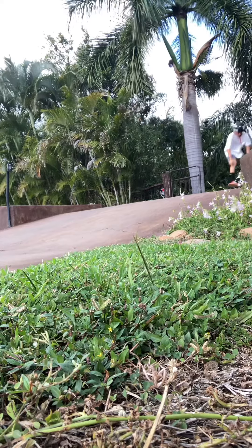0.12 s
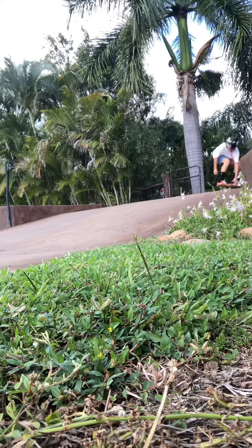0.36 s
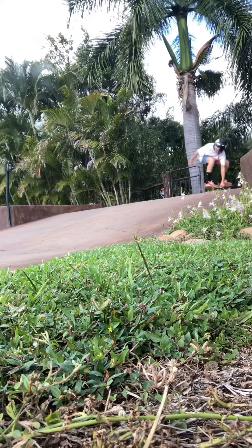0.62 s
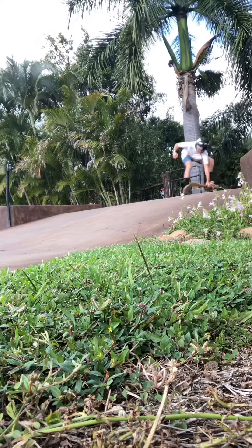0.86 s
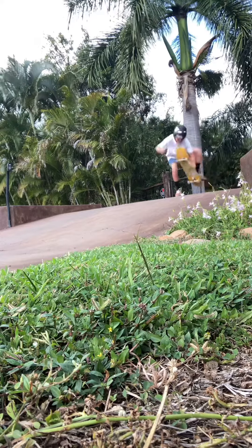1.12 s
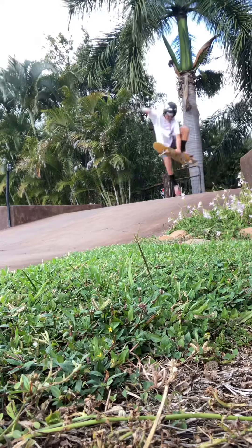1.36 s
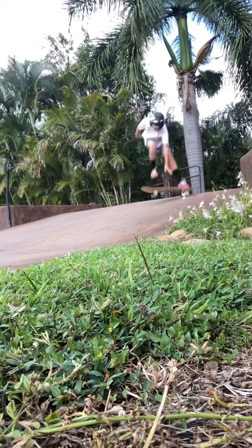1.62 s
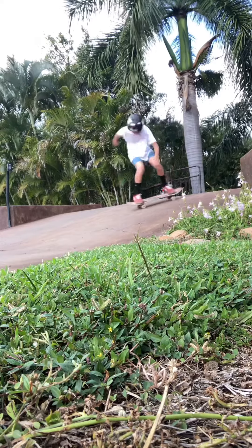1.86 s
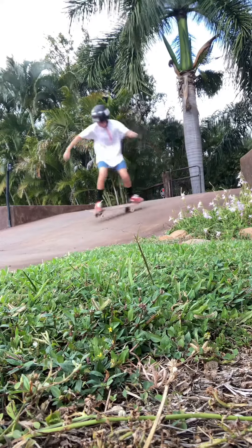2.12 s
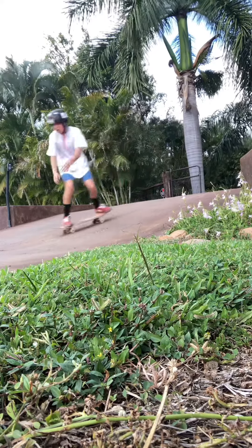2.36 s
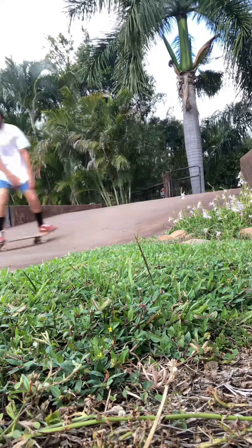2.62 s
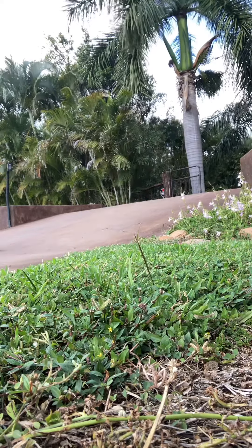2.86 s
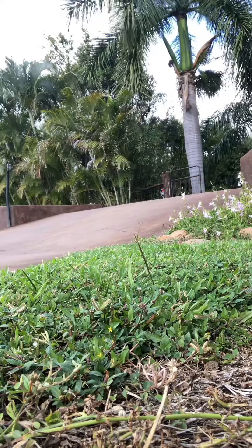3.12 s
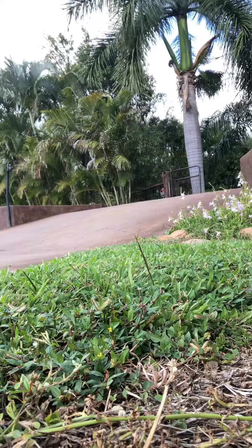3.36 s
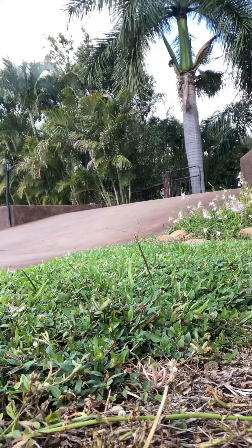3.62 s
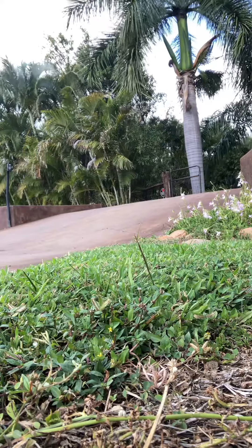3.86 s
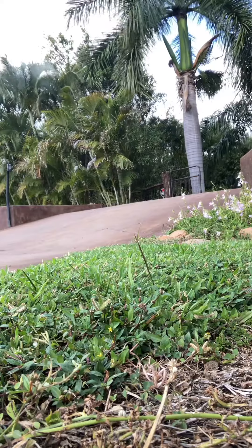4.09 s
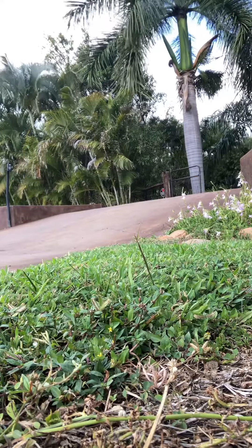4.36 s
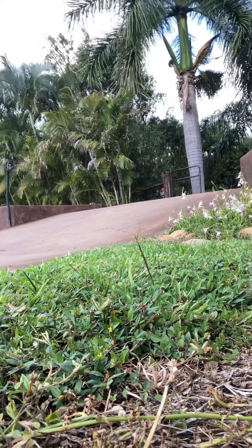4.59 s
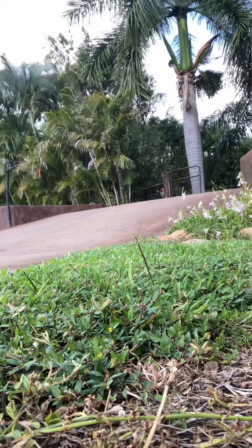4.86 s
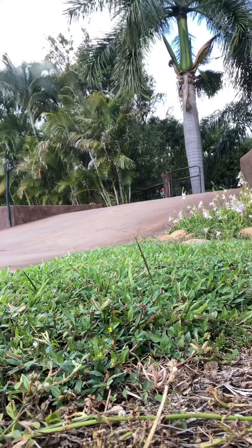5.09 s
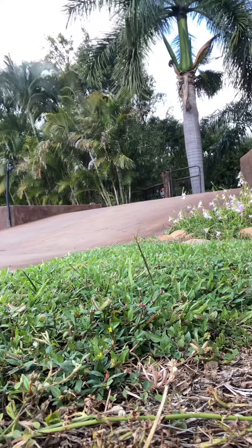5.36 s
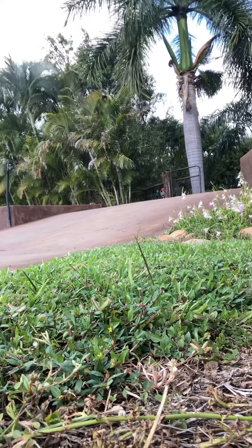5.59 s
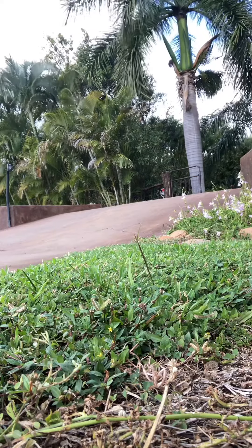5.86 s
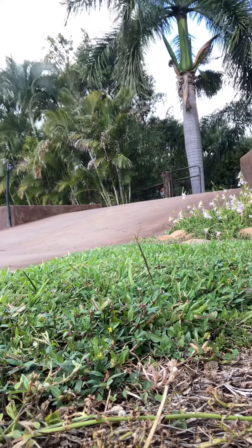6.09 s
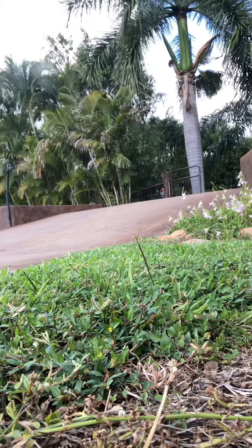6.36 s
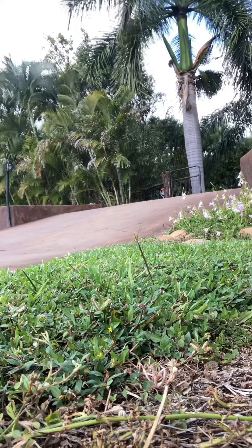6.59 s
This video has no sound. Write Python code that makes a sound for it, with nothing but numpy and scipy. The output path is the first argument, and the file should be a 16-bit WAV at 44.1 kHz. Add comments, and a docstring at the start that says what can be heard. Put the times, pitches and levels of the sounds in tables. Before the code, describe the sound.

Soft garden air with a low hum surrounds a rough concrete drive, heard in stereo by a small microphone near the ground. From 0 s, faint skateboard wheels rumble on the right, with light scraping from 0.6. At about 0.98 the tail pops: one sharp, bright wooden snap. Rolling nearly vanishes while the board is airborne, with tiny scuffs near 1.6. At 1.64-1.73 it lands in a violent, dense burst of deep thuds and cracks, the loudest moment. Another clack comes at 1.98, more at 2.2. Rolling swells, loudest around 2.5-2.8, gritty and hollow, with low bumps and jolts as it passes to the left. From 3.3 it is farther off: booming thuds, rattling scrapes and small clacks, thinning after 4.3. Knocks come at 5.3 and 5.75, a faint rising bird chirp at 5.9-6.0, a last clatter at 6.15, then small taps until about 6.45 and quiet air.

```python
"""A rough concrete drive by a quiet garden, heard by a small two-port microphone close to the ground.
A skateboarder rolls in from the right, pops the board, lands hard and rolls past to the left; far off the
board scrapes, clatters and bounces to rest. A bird chirps once. Rolling is coloured noise and ringing stones
sharing one chain of knocks, blows are rough contacts filtered by board modes, bumps and jolts are decaying
sines, the bird is a gliding sine and the garden air is shaped stereo noise."""
import sys
import numpy as np
from scipy import signal
from scipy.io import wavfile
from scipy.ndimage import uniform_filter1d

SR = 44100
rng = np.random.default_rng(int(sys.argv[2]) if len(sys.argv) > 2 else 0)


def gain_from_decibels(decibels):
    """Convert decibel values to linear amplitude factors."""
    exponent = np.asarray(decibels, float) / 20
    return 10 ** exponent


def wav_out(sig):
    """Save sig, one row per channel (or a flat mono array), as 16-bit PCM at SR to the path in sys.argv[1]."""
    wavfile.write(sys.argv[1], SR, np.round(np.clip(np.atleast_2d(sig).T, -1, 1) * 32767).astype(np.int16))


N = 296352  # samples

# Steady rolling, quiet while the board is in the air. Each row: time in seconds, level of the deck hum in dB.
ROLL_LEVEL = [(0, -49.5), (.4, -44.5), (.65, -45.5), (.9, -54), (1.08, -49.5), (1.5, -56), (1.8, -68),
              (1.88, -42.5), (2.08, -35.5), (2.19, -35.5), (2.26, -29.5), (2.5, -24), (2.7, -25.5),
              (2.9, -29), (3.05, -31.5), (3.13, -30), (3.3, -34), (3.42, -28.5), (3.55, -41), (3.67, -29.5),
              (3.78, -32.5), (4.05, -31), (4.35, -36), (4.58, -40.5), (4.7, -37), (4.85, -41.5),
              (5.15, -39), (5.3, -61), (5.55, -53.5), (5.9, -50), (6.1, -69.5), (6.72, -90)]
# Other rolling layers against the hum, changing with load and distance.
# Each row: time in seconds, rumble in dB, rattle in dB, grit in dB.
LAYER_SHARES = [(0, 8, -8.5, -21), (.3, 4.5, -9.5, -16), (.7, 2.5, -17, -19.5), (1.1, -4, -4.5, -6),
                (1.9, -11, -1, 1), (2.3, -6, -14, -18), (2.9, -7.5, -7, -16.5), (3.25, -3.5, -7.5, -14),
                (3.5, 1, -9.5, -14), (4.1, -10, -8.5, -16), (4.3, -1, -9.5, -18.5), (4.6, 3, -9.5, -18.5),
                (5.1, -9, -4.5, -12), (5.5, 4.5, -0.5, -12.5), (6.72, 0, 9, -32)]
# Scrapes and rough stretches that set the trucks rattling. Each row: start in seconds, length in seconds,
# rattle in dB, hum above rattle in dB, grit above rattle in dB.
SCRAPES = [(0.635, 0.3, -46.5, 4.5, -2), (0.88, 0.17, -46.5, 11.5, -0.5), (1.017, 0.11, -50, -4, -3),
           (1.591, 0.24, -42, -3.5, 0.5), (1.82, 0.11, -48.5, 8.5, 3), (2.598, 0.12, -29, 9.5, -5),
           (2.733, 0.32, -32, -13, -3), (3.28, 0.14, -31, -2, -14), (3.441, 0.37, -30.5, 1.5, -10.5),
           (3.814, 0.18, -40.5, 4, -5.5), (4.06, 0.14, -34, -16, -15), (4.342, 0.23, -38, -18, -10),
           (4.855, 0.15, -33.5, -11, -10.5), (4.978, 0.15, -30, -5, -17), (5.343, 0.047, -43, -2, -11),
           (5.523, 0.35, -42, 0, -14.5), (5.613, 0.15, -37.5, 1.5, -24), (6.141, 0.28, -51, 0, -6),
           (6.431, 0.14, -58, -3, -4)]
SCRAPE_EDGE, SCRAPE_RUMBLE_DB = 0.79, -10.5  # power of the sine arch; rumble against the scrape's hum

# Spectra of the rolling layers. Each row: frequency in Hz, relative density in dB per Hz.
RUMBLE_COLOUR = [(30, -31), (60, -32), (110, -3), (200, -5.5), (300, -13), (600, -52.5), (6000, -89)]
HUM_COLOUR = [(120, -29), (220, -5.5), (350, 1.5), (520, 0.5), (750, -2), (1000, -9), (1500, -53.5),
              (12000, -87)]
RATTLE_COLOUR = [(500, -7.5), (900, 5), (1300, 7), (1700, 0.5), (2100, -11), (2350, -12), (2900, -22.5),
                 (4500, -42), (12000, -76)]
GRIT_COLOUR = [(1500, -13), (2600, -7), (3400, -5.5), (4200, -5.5), (5000, -5), (6200, -1), (8000, 0.5),
               (11000, 5.5), (14000, 7), (15700, 5.5), (15950, -69)]
# Hollow ring of the wheels. Each row: time in seconds, pitch in Hz, level against the plain rattle in dB.
HOLLOW = [(0, 1710, -13), (.98, 2010, -7.5), (2.3, 1630, -4), (3.0, 1610, -25), (3.3, 1920, -5.5),
          (3.43, 1940, -4), (3.5, 1480, 1.5), (3.62, 1390, -5), (3.8, 1450, 1), (3.95, 1720, -2),
          (4.1, 1680, -1.5), (4.17, 1900, 0.5), (4.3, 1770, -0.5), (4.5, 1840, -4), (4.9, 1850, -6.5),
          (5.1, 1740, -5.5), (6.72, 1700, -2.5)]
HOLLOW_WIDTH_HZ = 283  # of each resonator pass
# Treble ring of the axles, moving with the load. Each row: time in seconds, lower pitch in Hz,
# its gain on the treble in dB, upper pitch in Hz, its gain on the treble in dB.
AXLES = [(0, 6360, -6, 10400, 0), (.7, 6300, -8, 9000, -4), (.98, 6440, -3, 8700, -1),
         (1.1, 6300, -12, 9500, -22), (1.62, 5800, -12, 9500, -11), (1.64, 5900, 7.5, 9600, -17),
         (1.66, 6170, -3, 8500, 0), (1.73, 6640, -2, 9450, -9), (1.8, 6300, -8, 9600, -11),
         (2.2, 6000, -6, 10800, -19), (2.6, 5930, -0.5, 11100, -3), (2.95, 5800, -2, 10600, 4.5),
         (3.1, 4800, -0.5, 10600, 1.5), (3.7, 5000, -0.5, 10500, -15), (3.8, 6030, -18, 10400, -3.5),
         (4.15, 4400, -20, 11000, 1), (4.3, 4440, -7, 11000, -9), (4.36, 4370, -3, 6800, -8),
         (4.5, 4350, -6, 6700, -1.5), (4.85, 4600, 1, 6900, -13), (4.92, 4600, -3, 7260, -9),
         (5.05, 4730, 6, 9500, -10), (5.2, 4600, -9, 9500, -15), (5.8, 4700, 0, 9440, -5),
         (6.72, 4500, -11, 9500, -3)]
# Widths of the lower and upper axle resonators, per pass, in Hz.
AXLE_WIDTH_HZ = (1630, 2200)

# Blows on the board, layer levels over 10 ms before mixing. Each row: time in seconds, deck in dB,
# truck clack in dB, crack in dB, nominal contact decay time (t60) in seconds, later held within limits.
BLOWS = [(0.812, -37.5, -40.5, -39, 0.064), (0.934, -28, -50, -43, 0.034),
         (0.981, -18.5, -18.5, -27, 0.034), (0.997, -30, -48, -32.5, 0.17), (1.01, -26.5, -36, -32, 0.15),
         (1.555, -38.5, -44, -42.5, 0.11), (1.586, -41, -43, -42, 0.094), (1.64, -12.5, -34, -16.5, 0.031),
         (1.646, -21, -45, -45, 0.03), (1.654, -29, -45, -24, 0.044), (1.659, -23.5, -49, -44, 0.025),
         (1.677, -11.5, -41, -16.5, 0.033), (1.681, -18, -50, -40, 0.01), (1.694, -20.5, -50, -25.5, 0.031),
         (1.7, -28, -36, -46, 0.033), (1.709, -26, -41, -34, 0.025), (1.724, -32, -53, -26.5, 0.02),
         (1.728, -15, -55, -33, 0.066), (1.734, -20, -36, -28, 0.02), (1.82, -35, -51, -42.5, 0.034),
         (1.907, -50, -60, -31, 0.014), (1.963, -35, -38, -31, 0.071), (1.97, -26.5, -44, -30, 0.088),
         (1.976, -25, -26.5, -18.5, 0.09), (1.985, -14.5, -30, -30, 0.035),
         (2.204, -18.5, -28, -24.5, 0.047), (2.213, -21.5, -23.5, -24.5, 0.11),
         (2.24, -20, -28, -36, 0.038), (2.287, -37, -44, -41.5, 0.014), (2.316, -24, -47, -49, 0.0037),
         (2.48, -31, -40, -34.5, 0.032), (2.491, -30, -35, -33.5, 0.073), (2.554, -20, -24.5, -30, 0.062),
         (2.62, -47, -23, -30, 0.088), (2.648, -27, -49, -32, 0.03), (2.667, -31, -55, -51, 0.055),
         (2.695, -24, -22.5, -32, 0.046), (2.764, -50, -50, -41, .012), (2.785, -21.5, -24.5, -30, 0.18),
         (2.821, -27, -33, -38, 0.032), (2.988, -28, -46, -35.5, 0.13), (3.004, -36, -41, -41, .015),
         (3.037, -27.5, -45, -48, 0.022), (3.336, -50, -28.5, -34, 0.023), (3.345, -35, -31, -45, 0.0093),
         (3.394, -51, -27, -53, 0.035), (3.403, -52, -25.5, -40.5, 0.019), (3.503, -53, -29, -41, 0.026),
         (3.515, -52, -41, -39, 0.017), (3.528, -58, -29.5, -39, 0.022), (3.565, -47, -40, -35.5, 0.016),
         (3.661, -50, -50, -40, 0.01), (3.784, -52, -47, -42, .01), (3.849, -49, -30.5, -40, 0.066),
         (3.932, -55, -52, -44, .008), (3.951, -55, -50, -48, .01), (4.091, -55, -45, -53, 0.0087),
         (4.119, -30, -47, -59, 0.029), (4.159, -31, -35, -38.5, 0.027), (4.227, -43, -29.5, -45, 0.04),
         (4.319, -60, -49, -57, .01), (4.369, -58, -55, -52, .008), (4.397, -55, -47, -46, .012),
         (4.445, -60, -55, -47, .012), (4.565, -60, -44, -49, .01), (4.812, -51, -35.5, -46, 0.035),
         (4.844, -62, -45, -47, .008), (4.875, -59, -35, -47, 0.022), (4.889, -54, -36, -42, 0.027),
         (4.908, -49, -33, -43, 0.045), (4.923, -55, -36, -51, .012), (5.026, -38, -35, -52, .02),
         (5.09, -33, -50, -55, 0.016), (5.333, -33.5, -36, -42, 0.068), (5.345, -30, -33, -44.5, 0.034),
         (5.713, -51, -39.5, -53, 0.019), (5.764, -30.5, -37, -66, 0.027), (5.776, -44, -30, -55, 0.088),
         (6.154, -44, -31, -55, 0.038), (6.157, -35, -24, -46, 0.031), (6.164, -34, -33, -49, 0.047),
         (6.263, -48, -36.5, -55, 0.06), (6.268, -42.5, -33, -61, 0.038), (6.325, -59, -40, -74, 0.068),
         (6.446, -40.5, -50, -57, 0.046), (6.459, -42, -61, -65, 0.12)]
# Board modes before extra damping, lowest deck mode first, then the trucks.
# Each row: frequency in Hz, level in dB, nominal t60 in seconds.
BOARD_MODES = [(287, 0, 0.051), (793, -5, 0.13), (1080, -15, 0.26), (1135, -3, 0.067), (1485, 3, 0.2),
               (1590, -8, 0.14), (2020, -5, 0.25), (2210, -39.5, 0.113)]
LOW_MODE_DB, DECK_T60_S = -19.5, 0.049  # lowest deck part against the higher; nominal t60 of the higher mode
# The feet load the deck. Each row: time in seconds, pitch of the higher deck mode in Hz,
# dullness of the truck knock from 0 to 1.
LOAD = [(.93, 475, 0.2), (.98, 519, 0), (1.01, 492, 0), (1.64, 530, 1), (1.68, 559, .1), (1.73, 576, 0.1),
        (1.98, 522, 0.26), (2.2, 612, 0.8), (2.8, 535, 0.58), (4.2, 560, 0), (5.3, 615, 0.3),
        (5.8, 490, 0.7), (6.16, 510, 0.66), (6.27, 520, 0.9), (6.33, 520, 0.75), (6.45, 650, .8)]
# The rider's weight flexes the whole deck in its lowest mode. Each row: time in seconds, level in dB.
THUDS = [(.934, -29), (0.982, -31.5), (1.646, -15), (1.649, -13), (1.658, -38), (1.677, -18.5),
         (1.735, -17.5), (2.213, -31), (2.238, -29), (2.541, -46), (2.616, -36), (2.782, -36), (3.036, -34),
         (3.335, -19), (3.348, -20.5), (3.407, -28), (3.527, -25), (3.783, -26.5), (3.846, -26),
         (4.122, -30), (5.711, -29.5), (5.788, -38), (6.164, -34)]
THUD_T60_S = 0.043  # nominal contact decay
# The tail or a wheel snaps hard on the concrete. Each row: time in seconds, level in dB, nominal t60 in seconds.
SNAPS = [(.934, -39, 0.018), (0.9807, -16, 0.01), (1.64, -16, 0.0092), (1.676, -59, .01),
         (2.204, -68, .012), (2.481, -46, .01), (6.157, -49, 0.014)]
# Spectra of snap, dull truck knock and crack. Each row: frequency in Hz, relative density in dB per Hz.
SNAP_COLOUR = [(1000, -30.5), (1500, 17), (2000, 3), (2500, 7), (3100, 7), (3700, 3), (4200, -1),
               (4800, -36), (6400, -3), (9000, -31), (15000, -50)]
DULL_KNOCK_COLOUR = [(400, -28), (700, -4.5), (920, 1.5), (1200, -1.5), (1700, -21), (2300, -23),
                     (3000, -42), (12000, -80)]
CRACK_COLOUR = [(1500, -21), (2600, -13), (3400, -17.5), (4400, -10), (5200, -4), (6200, -3), (8000, -2),
                (11000, 2.5), (14000, 4.5), (15700, 2.5), (15900, -16), (16400, -23), (16700, -69)]

# Wheels drop over joints and dips, and the ground booms.
# Each row: time in seconds, level before decay in dB, settled pitch in Hz.
BUMPS = [(2.213, -33, 166), (2.362, -25, 140), (2.483, -17.5, 115), (2.624, -18, 129), (2.791, -15, 190.5),
         (2.998, -21, 152), (3.07, -18, 187), (3.228, -20, 170), (3.266, -17, 202), (3.328, -30, 199),
         (3.343, -17.5, 113), (3.414, -19.5, 217), (3.432, -22, 218), (3.454, -16, 153), (3.54, -17, 109),
         (3.61, -23, 129), (3.787, -28, 118), (3.859, -20, 115), (3.978, -24, 123), (4.106, -27, 200),
         (4.255, -33, 135), (4.309, -21, 189), (4.671, -28, 136), (5.345, -37.5, 187), (5.678, -44, 156),
         (5.761, -21.5, 209)]
BUMP_CYCLES, BUMP_SAG = 2.47, 0.16  # cycles to decay by 1/e; share by which the pitch starts high
# A wheel strikes a stone edge squarely. Each row: time in seconds, level before decay in dB.
JOLTS = [(2.4902, -19), (2.5565, -24), (2.592, -21), (2.629, -18), (2.6375, -18), (2.649, -23),
         (2.667, -20), (2.7, -21), (2.779, -18), (2.797, -21), (2.852, -22), (3.544, -23), (4.121, -25)]
JOLT_HZ, JOLT_CYCLES = 560, 0.8  # pitch; cycles to decay by 1/e

# The bird's whistle. Each row: time in seconds, mean pitch in Hz, mean level in dB.
CHIRP = [(5.897, 4100, -85), (5.912, 4080, -61), (5.935, 4150, -68), (5.95, 4040, -79), (5.978, 4180, -66),
         (5.997, 4230, -75), (6.01, 4390, -63), (6.02, 4400, -85)]
# Spectrum of the garden air. Each row: frequency in Hz, relative density in dB per Hz.
AIR_COLOUR = [(18, -61), (30, -3.5), (53, 7.5), (163, -13.5), (200, -10.5), (240, -14), (1300, -26),
              (2310, -23), (2490, -30.5), (3680, -31.5), (12800, -39.5), (15000, -61), (15700, -60),
              (15900, -95)]
AIR_DB = -47.5
# Likeness of the air at the two ports. Each row: frequency in Hz, left-right correlation.
AIR_LIKENESS = [(60, 0.96), (150, 0.74), (380, 0.8), (950, 0.25), (2380, -0.5), (5980, 0.98), (15000, 0.96)]

# Ground bounce in front of the microphone, and dulling with distance.
# Each row: time in seconds, extra delay in ms, treble loss in dB per kHz.
BOUNCE = [(0, 0.13, 1.5), (.62, .11, 0.1), (.9, 0.11, 2.5), (1.64, 0.11, 1.5), (1.75, 0.11, 1.2),
          (2.2, .15, 0.5), (2.5, 0.19, 1.14), (2.85, 0.21, 1.3), (3.3, 0.22, 1.4), (3.7, 0.21, 0.76),
          (4.2, 0.21, 1.46), (4.8, 0.27, 1.5), (5.15, 0.25, 2), (6.72, 0.24, 3.5)]
# Times at which the board is on the right, in front and far on the left. Each row: time in seconds.
BEARING_S = [1.2, 2.7, 4.7]
# Port level differences for a near and a far-left board, faded out at the top.
# Each row: frequency in Hz, left minus right in dB.
PORT_TILTS = [
    [(60, 1), (140, -6.5), (330, -4.5), (500, -8.5), (770, -7.5), (1170, -0.5), (1790, 5.5), (2740, -4),
     (4190, 0.5), (6410, 0.5)],
    [(60, -6.5), (140, 0.5), (210, -5), (500, -1.5), (770, 4), (1170, 1.5), (1790, 14), (2740, 16.5),
     (4190, -1.5), (6410, 16.5)],
]
# Port phase for the three bearings, faded out at the top.
# Each row: frequency in Hz, lead of the left port in radians.
PORT_LEADS = [
    [(0, 0), (600, -0.8), (1120, -3.3), (2150, -5.6), (2670, -9.5), (3190, -8.3), (3700, -10.9),
     (4650, -10.6), (5510, -12.4)],
    [(0, 0), (500, 0.2), (860, 1.5), (1700, 4.4), (2500, 5.9), (3010, 3.7), (3600, 6.3), (7500, 6.3)],
    [(0, 0), (430, 0.8), (1800, 3.8), (2500, 4), (2930, 3.4), (4130, 5.5), (5170, 5.5), (6000, 7),
     (7500, 6.3)],
]


def evened(x):
    """Normalization: scales a signal to unit mean power."""
    return x / np.sqrt(np.mean(x ** 2) + 1e-20)


def read(points, hz):
    """Interpolation of a spectrum on a logarithmic frequency axis."""
    f, value = np.transpose(points)
    return np.interp(np.log(hz + 1), np.log(f + 1), value)


def colour(points):
    """Minimum phase: a causal, unit-energy impulse response follows from the log spectrum alone."""
    log_gain = np.log(gain_from_decibels(read(points, abs(np.fft.fftfreq(4096, 1 / SR)))))
    taps = np.fft.ifft(np.exp(np.conj(signal.hilbert(log_gain)))).real[:2048]
    return taps / np.linalg.norm(taps)


def ring(modes, damping):
    """Modal superposition: decaying sines sum to an impulse response of unit energy."""
    t = np.arange(SR // 5) / SR
    taps = np.zeros(len(t))
    for hz, db, t60 in modes:
        taps += gain_from_decibels(db - 60 * damping * t / min(t60, .15)) * np.sin(2 * np.pi * hz * t)
    return taps / np.linalg.norm(taps)


def through(x, taps):
    """Linear filtering: convolution cut to the scene's length."""
    return signal.oaconvolve(x, taps)[..., :N]


def lumps(per_s):
    """Low-passed chance: one-pole noise of unit power with its corner at per_s in Hz."""
    pole = np.exp(-2 * np.pi * per_s / SR)
    return evened(signal.lfilter([1], [1, -pole], rng.standard_normal(N)))


def resonate(x, hz, width_hz):
    """Heterodyne resonance: the moving pitch is turned to zero, smoothed and turned back, at peak gain 1."""
    turn = np.exp(2j * np.pi * np.cumsum(hz) / SR)
    r = np.exp(-np.pi * width_hz / SR)
    return 2 * (turn * signal.lfilter([1 - r], [1, -r], x / turn)).real


def garden():
    """Partly coherent noise: distant hum and leaves with drifting patches, alike by frequency at the ports."""
    frames, hz = N // 256 + 5, np.fft.rfftfreq(1024, 1 / SR)
    a, b, c, d, patches = rng.standard_normal((frames, 513, 5)).T
    patches = uniform_filter1d(patches, size=10, axis=0)  # over frequency
    patches = evened(uniform_filter1d(patches, size=14, axis=1))  # over time
    same = np.clip(read(AIR_LIKENESS, hz), -1, 1)[:, None]
    left = a + 1j * b
    right = same * left + np.sqrt(1 - same ** 2) * (c + 1j * d)
    z = np.array([left, right]) * gain_from_decibels(read(AIR_COLOUR, hz)[:, None] + 2.0 * patches)
    return gain_from_decibels(AIR_DB) * evened(signal.istft(z, nperseg=1024, noverlap=768)[1][:, :N])


def drive_levels():
    """Power addition: steady rolling and scrapes sum to gains of rumble, hum, rattle and grit."""
    t = np.arange(N) / SR
    s, rumble_db, rattle_db, grit_db = np.transpose(LAYER_SHARES)
    above_db = np.array([np.interp(t, s, c) for c in (rumble_db, 0 * s, rattle_db, grit_db)])
    power = gain_from_decibels(np.interp(t, *np.transpose(ROLL_LEVEL)) + above_db) ** 2
    for start, length, db, hum_db, grit_above_db in SCRAPES:
        arch = np.sin(np.pi * np.clip((t - start) / length, 0, 1)).clip(0) ** SCRAPE_EDGE
        above_db = np.array([[hum_db + SCRAPE_RUMBLE_DB], [hum_db], [0], [grit_above_db]])
        power += (gain_from_decibels(db + above_db) * arch) ** 2
    return np.sqrt(power)


def knocking(per_s, low_hz, high_hz, cycles):
    """Random excitation of modes: small stones ring the loaded deck for a few cycles at 24 pitches."""
    out, t = np.zeros(N), np.arange(4000) / SR
    for hz in np.geomspace(low_hz, high_hz, num=24):
        strength = gain_from_decibels(3.6 * np.minimum(rng.exponential(1, N), 2.5))
        stones = strength * (rng.random(N) < per_s / 24 / SR)
        envelope = np.exp(-t * hz / cycles) * np.minimum(t * hz, 1)
        out += through(stones, np.sin(2 * np.pi * hz * t) * envelope * np.sqrt(hz))
    return evened(out)


def roll():
    """Shared excitation: wheels knock over stones, and the knocks shake ground, deck, trucks and grit."""
    rumble_gain, hum_gain, rattle_gain, grit_gain = drive_levels()
    knocks = gain_from_decibels(4.6 * np.minimum(rng.exponential(1, N), 3.4)) * (rng.random(N) < 300 / SR)  # 300 a second
    shaking = evened(through(knocks, np.exp(-np.arange(800) / (0.002 * SR))))  # each lasts a few ms
    surface = gain_from_decibels(0.99 * lumps(42))  # rough and smooth stretches
    noise = rng.standard_normal((4, N)) * surface

    thuds = 0.13 * surface * knocking(per_s=73, low_hz=77.6, high_hz=226.7, cycles=18.0)
    rumble = through(noise[0] * (1 + 0.031 * shaking) + thuds, colour(RUMBLE_COLOUR))

    taps = 0.57 * surface * knocking(per_s=330, low_hz=223.9, high_hz=1042.6, cycles=10.4)
    hum = through(noise[1] * (1 + 0.4 * shaking) + taps, colour(HUM_COLOUR))

    ticks = 0.5 * surface * knocking(per_s=400, low_hz=908.0, high_hz=2205.0, cycles=11.3)
    rattle = evened(through(noise[2] * (1 + 0.96 * shaking) + ticks, colour(RATTLE_COLOUR)))
    t, (s, hz, db) = np.arange(N) / SR, np.transpose(HOLLOW)
    hz = np.interp(t, s, hz)
    hollow = resonate(noise[2] * (1 + 0.8 * shaking) + ticks, hz, HOLLOW_WIDTH_HZ)
    hollow = resonate(hollow, hz, HOLLOW_WIDTH_HZ)  # second pass steepens the skirts
    rattle = rattle + gain_from_decibels(np.interp(t, s, db)) * evened(hollow)

    hiss = noise[3] * (1 + 0.5 * shaking)
    sand = 0.62 * surface * knocking(per_s=930, low_hz=3635.0, high_hz=12850.0, cycles=7.8)
    sharp_ticks = 0.73 * surface * evened(knocks * np.sign(noise[0]))
    grit = through(hiss + sand + sharp_ticks, colour(GRIT_COLOUR))

    body = rumble_gain * evened(rumble) + hum_gain * evened(hum) + rattle_gain * 1.014 * rattle
    return body, grit_gain * evened(grit)


def axles(treble):
    """Sympathetic resonance: grit and cracks set the axles ringing in two broad moving bands."""
    t, (s, low_hz, low_db, high_hz, high_db) = np.arange(N) / SR, np.transpose(AXLES)
    out = treble
    for hz, db, width in zip((low_hz, high_hz), (low_db, high_db), AXLE_WIDTH_HZ):
        hz = np.interp(t, s, hz)
        band = resonate(resonate(treble, hz, width), hz, width)
        out = out + gain_from_decibels(np.interp(t, s, db)) * band
    return out


def struck(s, t60, db, taps, soft):
    """Impact excitation: a short rough contact drives one part of the board, at its level over 10 ms."""
    t, out = np.arange(4000) / SR, np.zeros(N + 4000)
    t60 = np.clip(t60, .006, .12)[:, None]
    drive = rng.standard_normal((len(s), 4000)) * gain_from_decibels(-60 * t / t60)
    if soft:
        drive *= np.minimum(t / 0.0016, 1) * gain_from_decibels(-25 * t / t60)
        drive += 0.5 * np.sin(np.pi * np.clip(t / 0.000826 - 1, 0, 1))  # the deck bends once, then rings
    else:
        drive *= np.minimum(t / (0.018 * t60), 1)
        drive *= 1 + 3.6 * np.exp(-t / 0.0006)  # a sharp front, then chatter
    parts = signal.fftconvolve(drive, taps * np.ones((len(s), 1)), axes=1)[:, :4000]
    for at, level_db, part in zip(np.round(s * SR).astype(int), db, parts):
        out[at:at + 4000] += gain_from_decibels(level_db) * part * np.sqrt(SR / 100) / np.linalg.norm(part)
    return out[:N]


def blows():
    """Modal response to impact: blows ring deck and trucks and crack; thuds drive the lowest deck part alone."""
    s, deck_db, clack_db, crack_db, t60 = np.transpose(BLOWS)
    load_s, load_hz, dull = np.transpose(LOAD)
    low = ring(BOARD_MODES[:1], damping=1.43)[:2048] + 0.25 * colour(HUM_COLOUR)
    high_hz = np.interp(s, load_s, load_hz)
    high = np.array([ring([(hz, 0, DECK_T60_S)], damping=0.91)[:2048] for hz in high_hz])
    high = high + 0.96 * colour(HUM_COLOUR)
    deck = struck(s, t60, deck_db + LOW_MODE_DB, low, soft=True) + struck(s, t60, deck_db, high, soft=True)

    trucks = ring(BOARD_MODES[1:], damping=2.3)[:2048] + 3.9 * colour(RATTLE_COLOUR)
    dull = np.clip(np.interp(s, load_s, dull), 0, 1)[:, None]
    clack = (1 - dull) * trucks / np.linalg.norm(trucks) + dull * colour(DULL_KNOCK_COLOUR)
    knocks = struck(s, t60, clack_db, clack, soft=False)
    wheel_hz = np.interp(np.arange(N) / SR, *np.transpose(HOLLOW)[:2])
    wheels = resonate(knocks, wheel_hz, HOLLOW_WIDTH_HZ)  # the wheels ring along

    snap_s, snap_db, snap_t60 = np.transpose(SNAPS)
    snaps = struck(snap_s, snap_t60, snap_db, colour(SNAP_COLOUR), soft=False)
    thud_s, thud_db = np.transpose(THUDS)
    thuds = struck(thud_s, np.full(len(thud_s), THUD_T60_S), thud_db, low, soft=True)
    cracks = struck(s, t60, crack_db, colour(CRACK_COLOUR), soft=False)
    return deck + 0.96 * knocks + wheels + snaps + thuds, cracks


def bumps():
    """Damped oscillation: each bump booms for a few low cycles that start high and sag in pitch."""
    t, out = np.arange(SR // 8) / SR, np.zeros(N + SR)
    for s, db, hz in BUMPS:
        turns = hz * t * (1 + BUMP_SAG * np.exp(-hz * t))
        envelope = np.minimum(hz * t, 1) * np.exp(-hz * t / BUMP_CYCLES)
        at = round(s * SR)
        out[at:at + len(t)] += gain_from_decibels(db) * envelope * np.sin(2 * np.pi * turns)
    return out[:N]


def jolts():
    """Impulse response: each jolt is about one heavily damped cycle of the deck, starting at once."""
    t, out = np.arange(SR // 50) / SR, np.zeros(N)
    s, db = np.transpose(JOLTS)
    out[np.round(s * SR).astype(int)] = -gain_from_decibels(db)
    return through(out, np.sin(2 * np.pi * JOLT_HZ * t) * np.exp(-JOLT_HZ * t / JOLT_CYCLES))


def bird():
    """Frequency modulation: one thin, uneven rising whistle with wavering pitch and level."""
    s, hz, db = np.transpose(CHIRP)
    t = np.arange(N) / SR
    level = gain_from_decibels(np.interp(t, s, db, left=-150, right=-150) + 1.5 * lumps(60))
    pitch = np.interp(t, s, hz) + 25 * lumps(40)
    return np.sqrt(2) * level * np.sin(2 * np.pi * np.cumsum(pitch) / SR)


def yard(x):
    """Diffuse reflection: walls and plants scatter a short decaying tail, different at each port."""
    t = np.arange(SR // 3) / SR
    tail = rng.standard_normal((2, len(t))) * gain_from_decibels(-60 * t / 0.13) * (t > .012)
    tail = signal.lfilter([1], [1, -.6], tail)  # leaves swallow the treble
    tail = signal.lfilter(*signal.butter(1, 600, "highpass", fs=SR), tail)  # bass passes through the plants
    return through(x[None], tail / np.linalg.norm(tail[0]))


def ports(body, treble):
    """Interference and bearing: ground bounce and distance colour the treble; port level and phase follow."""
    hz, t, z = signal.stft(np.array([body, treble]), SR, nperseg=512, noverlap=384)
    s, delay_ms, loss_db = np.transpose(BOUNCE)
    delay_s = np.interp(t, s, delay_ms) / 1000
    comb = 1 + 0.31 * np.exp(-2j * np.pi * hz[:, None] * delay_s)
    loss_db = np.clip(np.interp(t, s, loss_db), -.3, 4)
    dulling = gain_from_decibels(-(hz[:, None] / 1000 - 7) * loss_db)  # pivots at 7 kHz
    mono = z[0] + z[1] * comb * dulling

    reached_front = np.interp(t, BEARING_S[:2], [0, 1])
    far = np.interp(t, BEARING_S[1:], [0, 1])
    tilt_db = np.array([read(p, hz) for p in PORT_TILTS]).T @ [1 - far, far]
    phasors = np.array([np.exp(1j * np.interp(hz, *np.transpose(p))) for p in PORT_LEADS])
    lead = np.angle(phasors.T @ [1 - reached_front, reached_front - far, far])
    apart = np.clip((7500 - hz[:, None]) / 1500, 0, 1)  # the top is alike at both ports
    left = gain_from_decibels(apart * tilt_db / 2) * np.exp(1j * apart * lead)
    right = gain_from_decibels(-apart * tilt_db / 2)
    return signal.istft(mono * np.array([left, right]), SR, nperseg=512, noverlap=384)[1][:, :N]


def scene():
    """Superposition: board sounds reach the ports directly and by way of the yard; bird and air are added."""
    roll_body, roll_grit = roll()
    blow_body, blow_crack = blows()
    body = roll_body + blow_body + bumps() + jolts()
    treble = axles(roll_grit + blow_crack)
    scattered = gain_from_decibels(-18.0) * yard(body + 0.11 * treble)
    bird_pair = bird() * gain_from_decibels(np.array([[1.5], [-1.5]]))  # 3 dB stronger on the left
    return ports(body, treble) + scattered + bird_pair + garden()


def top_cut(x):
    """Nothing passes above the cut-off."""
    return signal.sosfilt(signal.butter(12, 16990, fs=SR, output="sos"), x)


def record(dry):
    """Saturation: the microphone drops the deep bass and softly clips the loudest blows."""
    low_cut = signal.sosfilt(signal.butter(3, 75, "highpass", fs=SR, output="sos"), dry)
    mix = 0.46 * np.tanh(low_cut / 0.73)
    return top_cut(mix)


dry = scene()
out = record(dry)
wav_out(out)
```